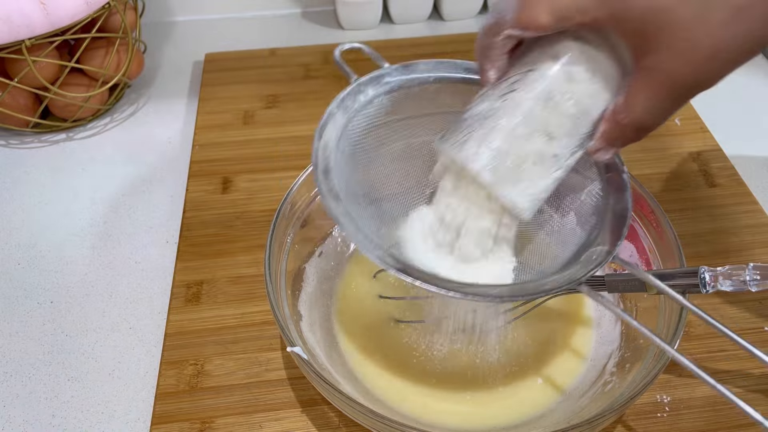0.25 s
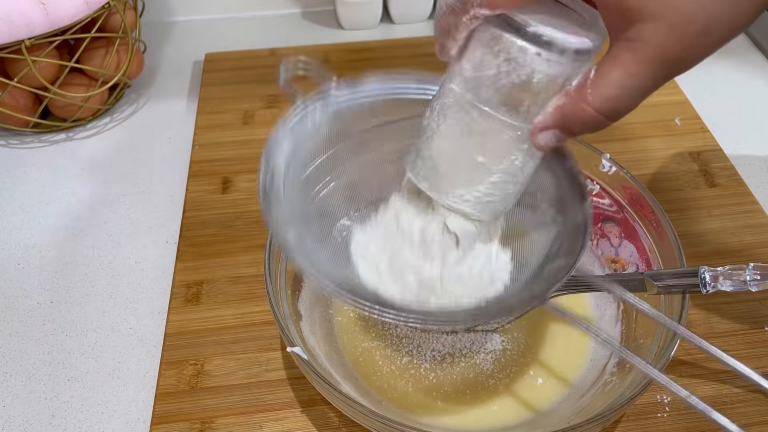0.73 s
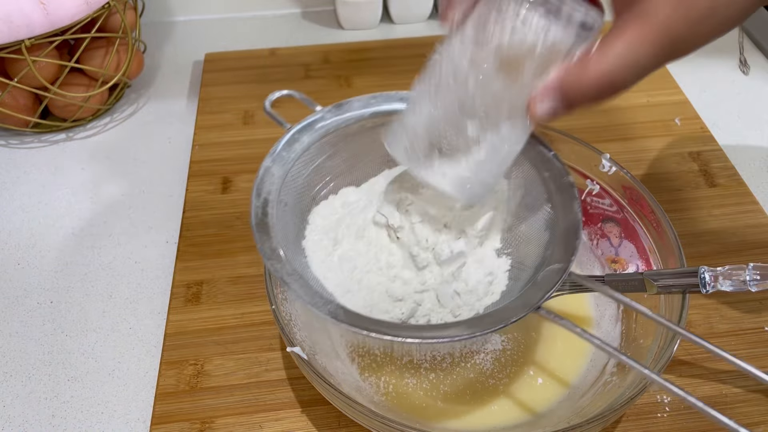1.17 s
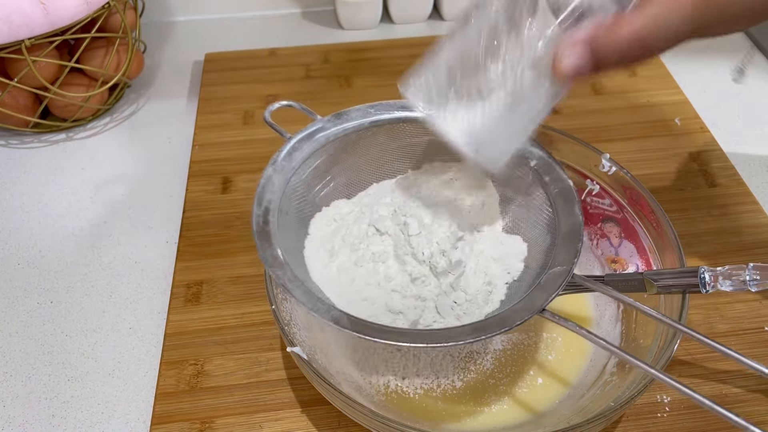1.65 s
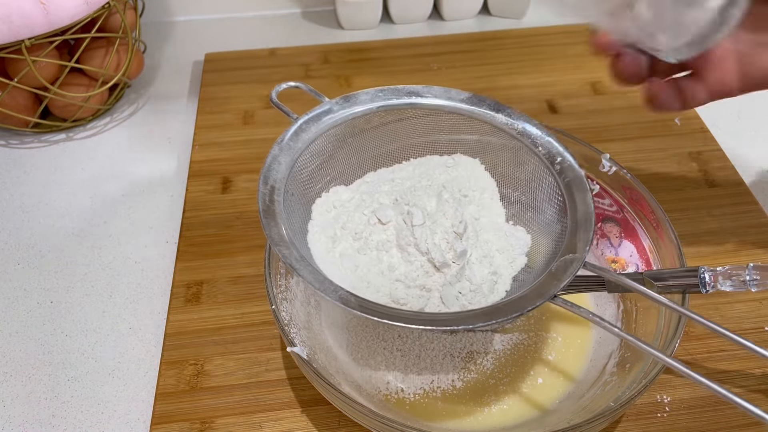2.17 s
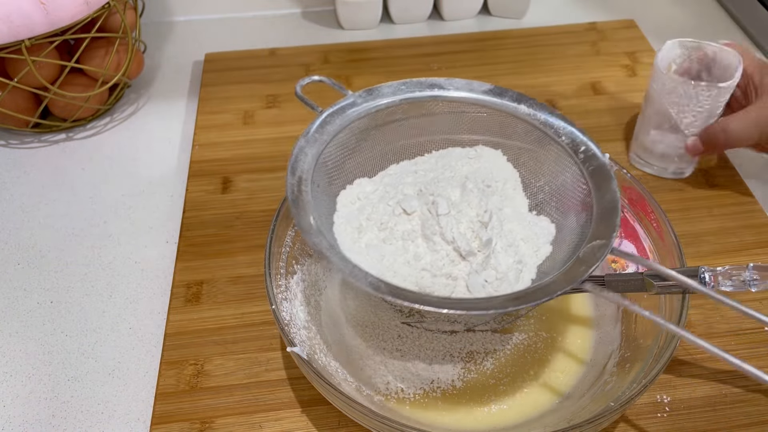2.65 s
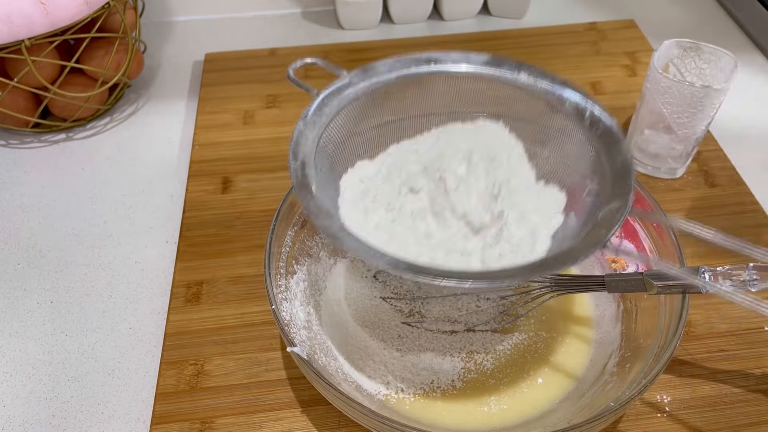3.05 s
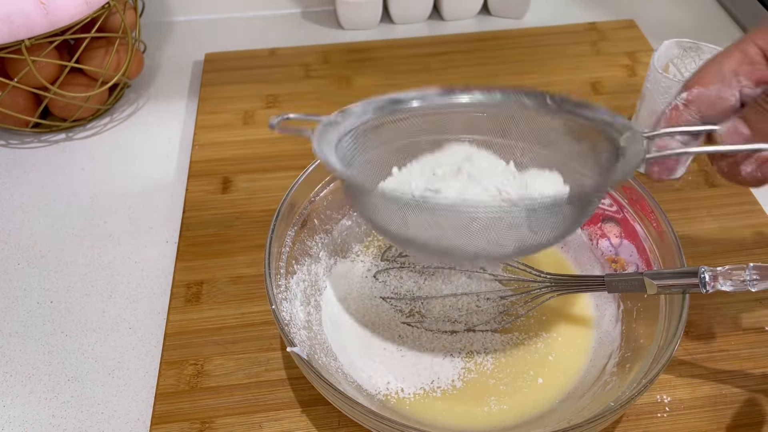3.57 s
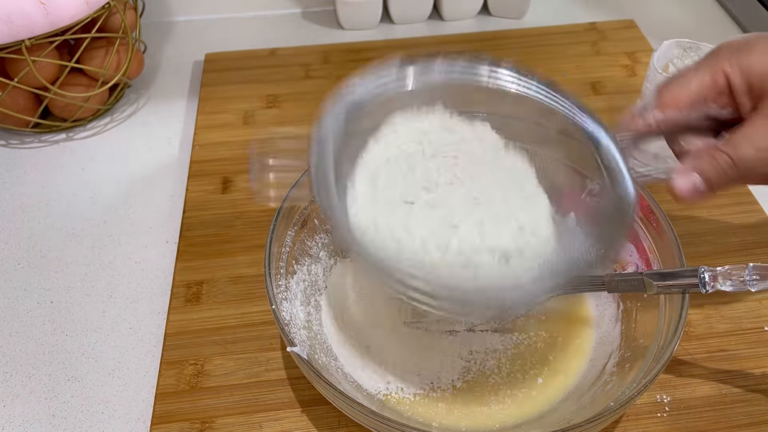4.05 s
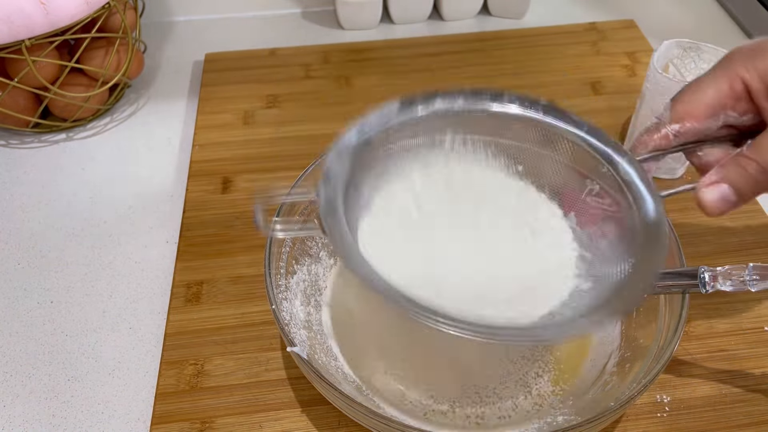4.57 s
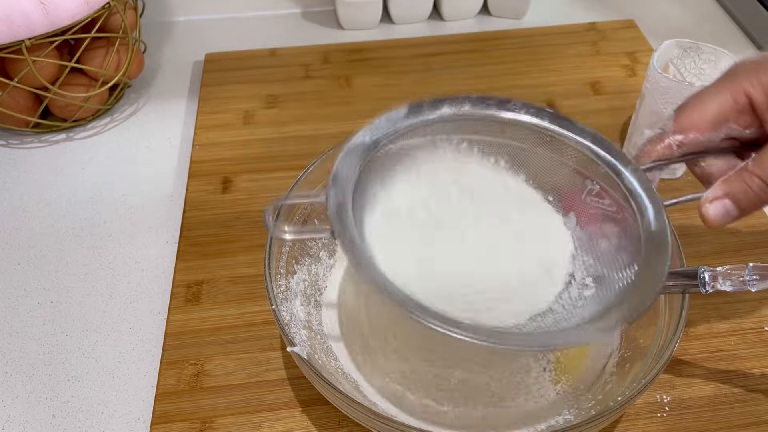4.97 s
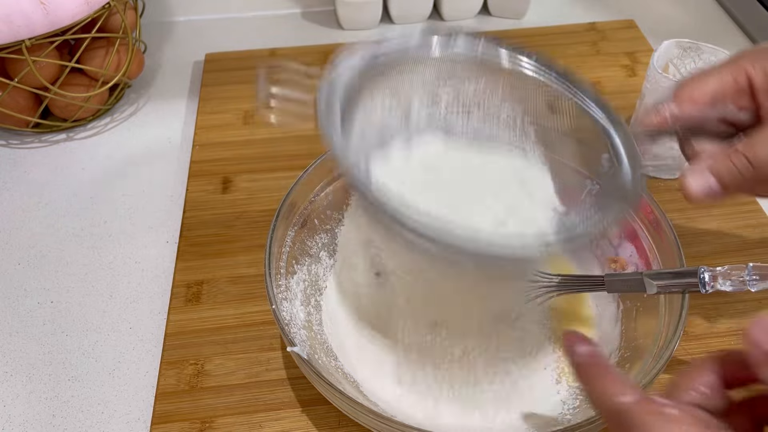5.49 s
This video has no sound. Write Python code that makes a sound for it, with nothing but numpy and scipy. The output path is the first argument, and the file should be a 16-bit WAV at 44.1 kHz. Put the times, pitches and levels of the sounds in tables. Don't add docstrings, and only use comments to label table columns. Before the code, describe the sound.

A sharp flick, then six bright ringing glass clinks on a metal sieve, a woody set-down thud, and rhythmic soft flour hiss in a kitchen.

```python
import sys
import numpy as np
from scipy import signal
from scipy.fft import rfft, irfft, next_fast_len
from scipy.io import wavfile
from scipy.ndimage import uniform_filter1d, map_coordinates

SR = 44100
rng = np.random.default_rng(int(sys.argv[2]) if len(sys.argv) > 2 else 0)


def gain_from_db(level_db):
    decades = np.asarray(level_db, float) / 20
    return 10 ** decades


def unload_wav(signal):
    wavfile.write(
        sys.argv[1],
        SR,
        np.round(np.clip(np.atleast_2d(signal).T, -1, 1) * 32767).astype(np.int16),
    )


N = 252693
T = np.arange(SR * 3 // 5) / SR


def along(points, hz):
    f, v = np.transpose(points)
    return np.interp(np.log(hz + 1), np.log(f + 1), v)


def spectrum_gain(points):
    return lambda hz: gain_from_db(along(points, hz))


def curve(rows):
    t = np.arange(N) / SR
    return sum(gain_from_db(db) * np.exp(-np.log(2) * (2 * (t - s) / width) ** 2) for s, db, width in rows)


def wobble(rate_hz):
    return map_coordinates(rng.standard_normal(200), [np.arange(N) * rate_hz / SR])


def unit(x):
    return x / np.sqrt(np.mean(x ** 2) + 1e-30)


def filtered(x, response):
    m = next_fast_len(x.shape[-1] + 4096)
    return irfft(rfft(x, m) * response(np.fft.rfftfreq(m, 1 / SR)), m)[..., :x.shape[-1]]


# (frequency [Hz], coherence [0-1])
DIFFUSE_LIKENESS = [(100, 1), (210, 0.96), (500, 0.15), (800, .3), (1200, 0.36), (1800, 1), (2700, 0.99),
                    (7000, 0.3), (10000, 0.98)]


def pair(n, gain, alike=DIFFUSE_LIKENESS):
    def mid_side(hz):
        turn = np.arccos(np.clip(along(alike, hz), 0, 1)) / 2
        return gain(hz) * [np.cos(turn), np.sin(turn)]

    mid, side = filtered(rng.standard_normal((2, n)), mid_side)
    return unit(np.array([mid + side, mid - side]))


def ring(modes, scatter_db, attack):
    hz, db, t60 = np.transpose(modes)[..., None]
    db = db + scatter_db * rng.standard_normal(db.shape)
    decaying = gain_from_db(db - 60 * T / np.abs(t60)) * np.sin(2 * np.pi * hz * T)
    return np.sum(decaying, 0) * (1 - np.exp(-T / abs(attack)))


def puff(gain, t60, attack):
    noise = unit(filtered(rng.standard_normal(len(T)), gain))
    return noise * gain_from_db(-60 * T / abs(t60)) * (1 - np.exp(-T / abs(attack)))


def click(spectrum):
    size = 4096
    cepstrum = irfft(np.log(gain_from_db(along(spectrum, np.fft.rfftfreq(size, 1 / SR)))))
    cepstrum[1:size // 2] *= 2
    cepstrum[size // 2 + 1:] = 0
    pulse = irfft(np.exp(rfft(cepstrum)))
    return np.pad(pulse / np.abs(pulse).max(), (0, len(T) - size))


# (frequency [Hz], t60 [s])
WALL_DECAY = [(150, 0.47), (700, 0.46), (3000, 0.63), (8000, .45), (15000, 0.24), (15900, 0.7),
              (16300, 0.025)]
# (frequency [Hz], coherence [0-1])
ECHO_LIKENESS = [(100, 0.99), (330, 1), (700, 0.3), (1500, 0.81), (2100, 0.9), (10000, 0.85)]


def add(out, s, sound, room_db, hidden=0, close=0):
    hz, t, z = signal.stft(pair(len(T), np.ones_like, ECHO_LIKENESS), SR, nperseg=256)
    decay = gain_from_db(-60 * t / along(WALL_DECAY, hz)[:, None])
    tail = signal.istft(z * decay, SR, nperseg=256)[1][:, :len(T)]
    scatter = 1 + gain_from_db(12) * gain_from_db(-60 * T / 0.021)
    tail = tail / np.linalg.norm(tail[0]) * (1 - np.exp(-T / 0.0014)) * scatter
    tail[:, round(.023 * SR):][:, :9] += gain_from_db(-18.5) * np.hanning(9)
    answer = signal.fftconvolve((sound + hidden)[None], tail, axes=1)[:, :len(T)]
    wet = sound + close + gain_from_db(room_db) * answer
    start = round(s * SR)
    out[:, start:start + len(T)] += wet[:, :N - start]


# (frequency [Hz], level [dB per Hz])
ROOM_FLOOR = [(41, -25.5), (70, -1), (129, -2), (147, -15), (204, -8.5), (231, -9.5), (477, -14.5),
              (516, -19), (801, -17.5), (1300, -24.5), (3000, -45), (3900, -62), (6600, -120)]
# (frequency [Hz], level [dB])
AIR_HISS = [(1500, -24.5), (2500, 0), (4200, 0.5), (6000, -9), (9000, -8), (14500, -11), (16000, -40.5)]
# (frequency [Hz], level [dB])
RUMBLE = [(20, -33), (35, -10.5), (52, 14.5), (80, -3.5), (120, -70)]
# (frequency [Hz], width [Hz], level [dB])
WHINES = [(204.26, 14.4, -74), (462, 120, -72.5), (1916, 110, -86), (4000, 170, -99.5)]
# (time [s], level [dB], length [s])
FAR_THUMPS = [(.14, -53, .11), (.4, -49, .1), (.52, -49.5, .06), (2.7, -52, .12), (3.0, -54.5, 0.028),
              (3.51, -55, .1), (4.0, -58.5, 0.23), (5.25, -54, .07)]
# (time [s], level [dB], length [s])
STIR = [
    (1.4, -69, 1),
    (2.8, -63, 0.23),
    (5.1, -72.5, 1.5),
]
# (time [s], level [dB], length [s])
REACH = (3.2, -82, 1.5)
FLOOR_DB, AIR_DB = -63, -91
RUMBLE_DB, RUMBLE_LUMPS_DB, RUMBLE_LUMPS_HZ = -59, 0.5, 6.4


def kitchen():
    floor = (gain_from_db(FLOOR_DB) + curve(STIR)) * pair(N, spectrum_gain(ROOM_FLOOR))
    air = (gain_from_db(AIR_DB) + curve([REACH])) * pair(N, spectrum_gain(AIR_HISS))
    lumps = gain_from_db(RUMBLE_DB + RUMBLE_LUMPS_DB * wobble(RUMBLE_LUMPS_HZ)) + curve(FAR_THUMPS)
    rumble = gain_from_db(-5.5) * lumps * pair(N, spectrum_gain(RUMBLE))
    whines = 0
    for centre_hz, width_hz, db in WHINES:
        whines = whines + gain_from_db(db) * pair(N, lambda hz: 1 / (1 + (2 * (hz - centre_hz) / width_hz) ** 2))
    return floor + air + rumble + whines


# (time at fullest [s], level [dB], length [s])
SLIDES = [(.05, -83.5, 0.36), (.41, -81.5, 0.13), (.63, -79, 0.1), (.78, -79, .07), (2.13, -69, .2),
          (2.47, -77.5, 0.048), (2.68, -82, .08), (2.83, -79, .07), (3.2, -77.5, .16), (3.4, -73, .15),
          (3.7, -85.5, .3)]
# (time at fastest [s], level [dB])
STROKES = [(3.612, -69.5), (3.967, -78.5), (4.065, -73), (4.164, -79.5), (4.271, -75), (4.377, -72),
           (4.501, -69), (4.6, -71.5), (4.717, -72.5), (4.821, -71), (4.927, -72), (5.029, -76.5),
           (5.144, -70), (5.25, -67), (5.353, -72.5), (5.457, -75), (5.571, -71.5), (5.655, -71)]
# (frequency [Hz], level [dB])
FLOUR_HISS = [(1200, -29.5), (2200, -8.5), (3500, -5), (5000, -6.5), (7500, -4.5), (9500, 0), (11500, -4),
              (14500, -1.5), (15800, -8), (16100, -37)]
TRICKLE_DB = -97.5
STROKE_S = 0.052
LOOSENED_DB, LOOSENED_S = -58.5, 0.097


def flour():
    shaken = [(s + LOOSENED_S / 2, db + LOOSENED_DB, LOOSENED_S) for s, db, *_ in KNOCKS]
    strokes = [(s, db, STROKE_S) for s, db in STROKES]
    flow = gain_from_db(TRICKLE_DB) + curve(SLIDES + shaken + strokes)
    grain = gain_from_db(2.7 * unit(uniform_filter1d(rng.standard_normal(N), size=90)))
    likeness = [(3000, 1.0), (7000, .8), (10000, 0.82)]
    return flow * unit(grain * pair(N, spectrum_gain(FLOUR_HISS), likeness))


# (time [s], level [dB], centre [Hz], width [octaves], t60 [s])
TICKS = [(0.717, -45, 248, 0.55, 0.016), (0.764, -48, 445, 0.25, 0.025), (0.777, -47.5, 410, 0.33, 0.03),
         (1.068, -61, 13030, 0.87, 0.013), (2.938, -59.5, 2947, 1.2, 0.017),
         (3.3786, -51, 5000, 1.2, 0.0087), (3.503, -66.5, 11000, 0.93, 0.012),
         (3.5563, -59, 1210, 1.8, 0.021), (3.6816, -57, 6960, 1, 0.034), (4.934, -59.5, 2644, 0.33, 0.012),
         (5.298, -66.5, 14030, 0.43, .008), (5.6113, -47.5, 5900, 1.94, .025)]
# (time [s], level [dB])
SNAP = (.0906, -11)
# (frequency [Hz], level [dB])
NAIL = [(400, -2), (900, -0.5), (2000, 2.5), (2900, 0), (4000, -11.5), (6000, 3.5), (10000, 10.5),
        (14000, -0.5), (16500, -21), (17200, -38)]
# (time [s], level [dB], frequency [Hz], length [s])
SQUEAKS = [
    (.64, -85, 2910, 0.063),
    (2.539, -83, 4000, 0.13),
    (3.247, -82.5, 1895, .3),
    (5.271, -83, 2383, 0.32),
    (5.401, -81, 1956, 0.18),
]
BROAD_OCTAVES, JOLT_DB = 1.6, -44


def ticks():
    out = np.zeros((2, N))
    for s, db, centre_hz, octaves, t60 in TICKS:
        touch = puff(lambda hz: np.exp(-(np.log2((hz + 1) / centre_hz) / octaves) ** 2), t60, 0.00066)
        jolt = (octaves > BROAD_OCTAVES) * gain_from_db(JOLT_DB) * click(THUMP)
        add(out, s, gain_from_db(db) * touch + jolt, room_db=-7.5)
    snap_s, snap_db = SNAP
    add(out, snap_s, gain_from_db(snap_db) * click(NAIL), room_db=-10)
    for s, db, centre_hz, width in SQUEAKS:
        swell = np.exp(-(2 * (np.arange(N) / SR - s) / width) ** 2)
        out += gain_from_db(db) * swell * pair(N, lambda hz: 1 / (1 + ((hz - centre_hz) / 70) ** 2))
    return out


# (time [s], board boom [dB], tock [dB])
SET_DOWN = [
    (2.6598, -22.5, -30),
    (2.6863, -25, -38),
]
# (frequency [Hz], level [dB], t60 [s])
BOARD = [(118, -1, 0.55), (145.5, 2, 0.31), (321.5, -7, 0.44), (415, -10.5, 5.0), (560, -18.5, 0.31),
         (685, -34, 0.16), (935, -9, 0.17), (1216, -36, 0.29), (1452, -38, 0.55)]
# (frequency [Hz], level [dB], t60 [s])
BASE = [(445, -9, 0.45), (640, 9, 0.04), (892, 3, 0.035), (1150, -2, 0.028), (1570, -14, 0.02)]
# (frequency [Hz], level [dB per Hz])
THUD = [(35, -57), (60, -62), (136, -4), (504, -16), (619, -7), (1030, -13), (1430, -23.5), (2440, -41.5),
        (8000, -61), (10400, -85.5), (17600, -120)]


def set_down():
    out = np.zeros((2, N))
    for s, boom_db, tock_db in SET_DOWN:
        short_modes = [(hz, g, min(t60, .2)) for hz, g, t60 in BOARD]
        board = ring(short_modes, scatter_db=5.0, attack=0.013)
        tock = ring(BASE, scatter_db=1, attack=0.0006)
        add(out, s, gain_from_db(boom_db - 5.5) * board + gain_from_db(tock_db) * click(THUD), room_db=-6.0,
            hidden=gain_from_db(boom_db + 5.5) * click(THUD), close=gain_from_db(tock_db) * tock)
    return out


LEAD_S, LEAD_DB = .009, -26
LEAD_HZ = [3000, 5000, 7095]


def lead_ins():
    out = np.zeros(N)
    bands = lambda hz: sum(1 / (1 + ((hz - c) / 200) ** 2) for c in LEAD_HZ)
    for s, db, *_ in KNOCKS:
        noise = unit(filtered(rng.standard_normal(len(T)), bands))
        brush = noise * (T < LEAD_S) * np.sin(np.pi * T / LEAD_S)
        out[round((s - LEAD_S) * SR):][:len(T)] += gain_from_db(db + LEAD_DB) * brush
    return out


# (time [s], knock [dB], 2.6 kHz mode [dB], 3.0 kHz mode [dB], 6.8 kHz mode [dB])
KNOCKS = [
    (0.9433, -33, -34.5, -35.5, -37),
    (1.1419, -19, -21.5, -20, -21),
    (1.3392, -21, -20, -27.5, -37),
    (1.514, -13, -20.5, -21, -13),
    (1.7019, -14, -22.5, -21.5, -13.5),
    (1.8826, -15.5, -44.5, -22, -13),
]
GLASS_HZ = [2622, 2972, 6820, 7755]
# (t60 [s], split [Hz], rise [s], first ring [dB])
GLASS_TWINS = [(0.4, 6.7, .0004, -5.5), (0.27, 5.3, .0004, 5.5), (0.1, 36, 0.0036, 6),
               (0.053, 44, 0.0024, 5)]
# (frequency [Hz], level [dB], t60 [s])
BRIGHT = [(7030, -14, 0.12), (7150, -19, 0.045), (7200, -14, 0.13), (7070, -21, 0.17), (8656, -22.5, 0.051),
          (10474, -16.5, .05), (11096, -12, 0.03), (11030, -9.5, .045), (14500, -31.5, .05),
          (15680, -25.5, .05)]
# (frequency [Hz], level [dB], t60 [s])
FRAME = [(139, -17, 0.021), (334, -25, 0.04), (573.5, -23.5, .15), (790, -17, 0.0572), (1261, -7, 0.0047),
         (1480, -21.5, 0.04), (2235, 0, 0.015), (3150, -27.5, 0.076), (3720, -40.5, 0.02)]
# (frequency [Hz], level [dB])
CRACK = [(200, -19), (1000, -8.5), (2200, -3), (3000, 9), (4400, -6), (5600, -2.5), (7400, -2.5),
         (9300, 1.5), (11000, -4), (12500, -5.5), (13700, -9), (15500, -13.5), (16500, -21.5), (17200, -37)]
# (frequency [Hz], level [dB])
THUMP = [(40, -27), (100, -7.5), (300, -0.5), (800, -1.5), (1600, -2), (3000, -21.5), (6000, -53.5)]
TOP_MODE_DB, TOP_MODE_GROWS = 10, 1.66
SIDE_MODE_HZ = 12470
WEIGHT_SHARE, HARD_KNOCK_DB = .3, -15.5


def knocks():
    out = np.zeros((2, N))
    touching = np.exp(-(T / 0.008) ** 2)
    grip = gain_from_db(-60 * np.clip(T - .08, 0, None) / .05)
    for s, db, *mode_db in KNOCKS:
        mode_db.append(TOP_MODE_DB + TOP_MODE_GROWS * mode_db[2])
        hard_db = np.mean(mode_db[2:])
        glass = gain_from_db(hard_db) * ring(BRIGHT, scatter_db=4.5, attack=0.00148)
        glass += ring([(SIDE_MODE_HZ, mode_db[1] - 12, .06)], scatter_db=5, attack=0.00049)
        for hz, (t60, split, rise, first_db), g in zip(GLASS_HZ, GLASS_TWINS, mode_db):
            twin_hz = hz + split * rng.uniform(0.51, 1)
            twins = ring([(hz, g - 5, t60), (twin_hz, g - 17, t60)], 0, rise)
            glass += (1 + gain_from_db(first_db) * touching) * twins
        softness_db = .3 * (hard_db - db)
        colour = [(hz, g + softness_db * max(np.log2(hz / 2500), 0)) for hz, g in CRACK]
        weight_db = WEIGHT_SHARE * (HARD_KNOCK_DB - db)
        frame = ring(FRAME, scatter_db=0.5, attack=0.0012)
        blow = gain_from_db(4) * click(colour) + gain_from_db(weight_db + 1.0) * click(THUMP)
        rattle = gain_from_db(2.5) * puff(spectrum_gain(colour), 0.034, 0.0002)
        rattle += gain_from_db(weight_db - 5.5) * puff(spectrum_gain(THUMP), 0.04, 0.00044)
        hidden = gain_from_db(db + 20.5) * click(colour) + gain_from_db(db + weight_db + 6.5) * click(THUMP)
        add(out, s, grip * glass + gain_from_db(db) * (frame + blow), room_db=-16.0,
            hidden=hidden, close=gain_from_db(db) * rattle)
    return out


def scene():
    return kitchen() + flour() + ticks() + set_down() + lead_ins() + knocks()


def top_cut(x):
    return signal.sosfilt(signal.butter(12, 17170, fs=SR, output="sos"), x)


# (frequency [Hz], left lead [rad])
PORT_PHASE = [(0, 0), (1500, 0), (2700, .45), (4100, .3), (4800, 1.4), (5050, -.1), (6000, .3), (8700, 2.7),
              (10000, 3.14), (11200, 3.7), (13600, 5.9), (15300, 6.3), (22050, 6.6)]
TOP_HZ = 16950


def record(dry):
    def ports(hz):
        lead = np.interp(hz, *np.transpose(PORT_PHASE)) / 2
        return (hz < TOP_HZ) * np.exp(1j * np.array([lead, -lead]))

    mix = filtered(dry, ports)
    return top_cut(mix)


dry = scene()
out = record(dry)
unload_wav(out)
```